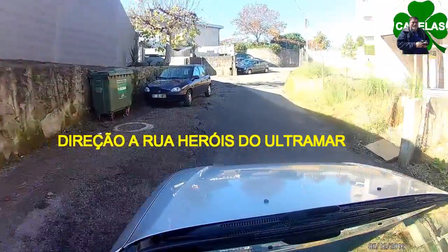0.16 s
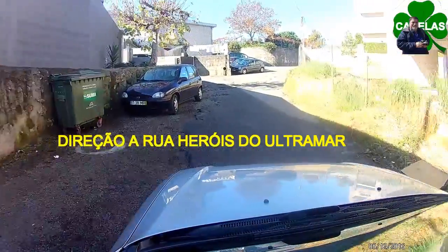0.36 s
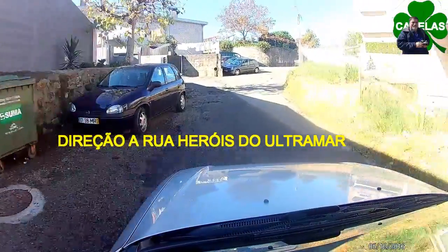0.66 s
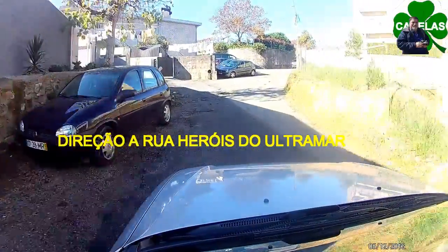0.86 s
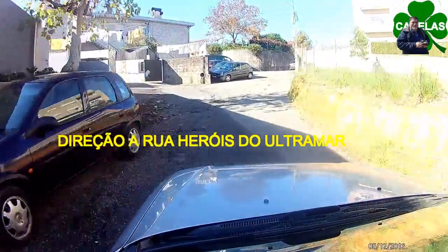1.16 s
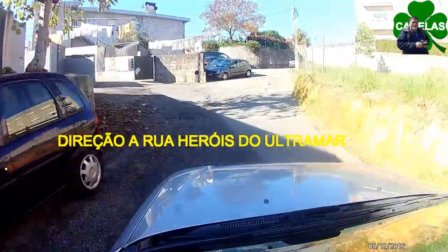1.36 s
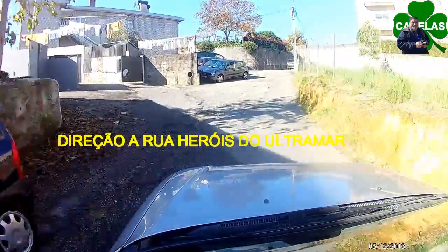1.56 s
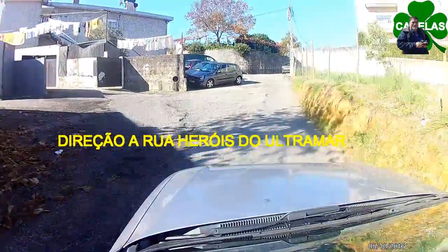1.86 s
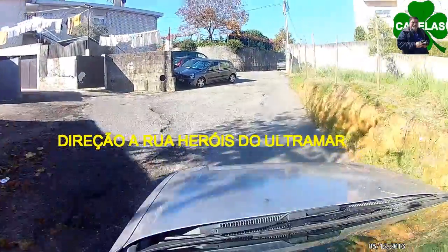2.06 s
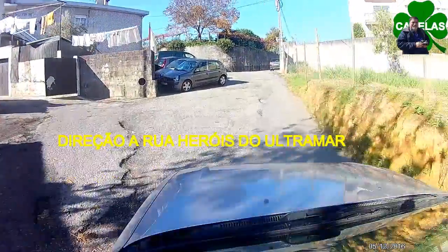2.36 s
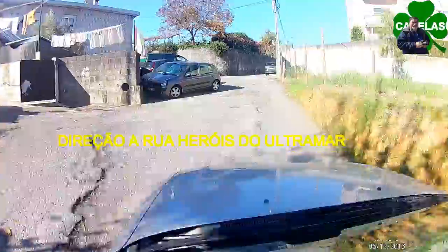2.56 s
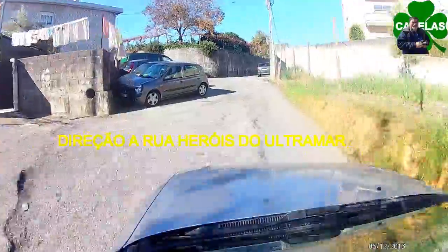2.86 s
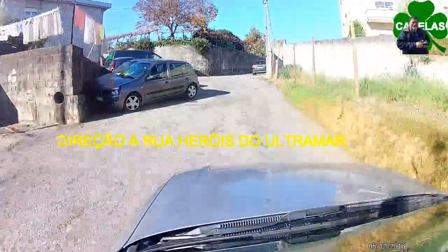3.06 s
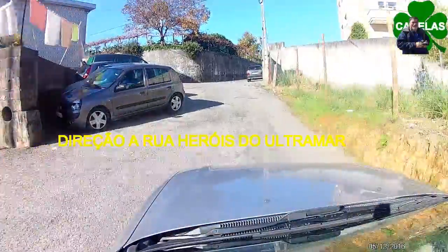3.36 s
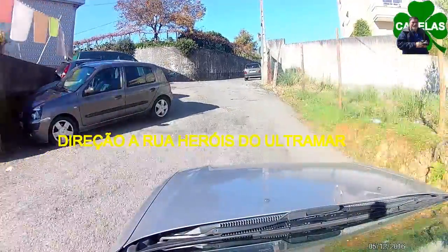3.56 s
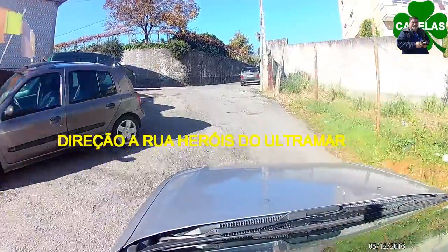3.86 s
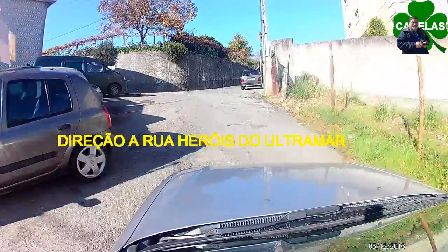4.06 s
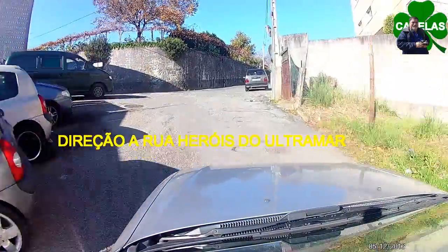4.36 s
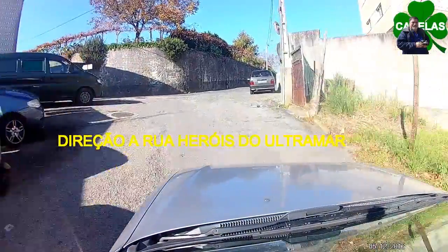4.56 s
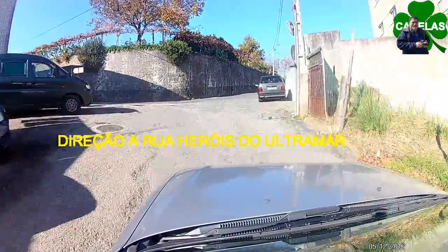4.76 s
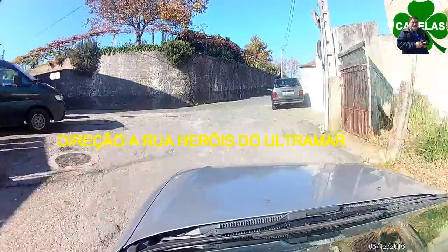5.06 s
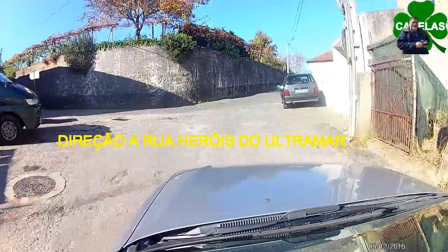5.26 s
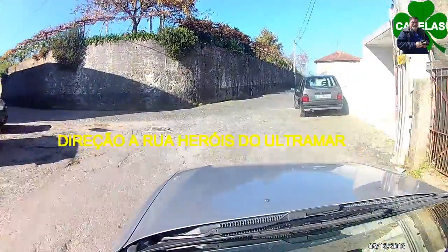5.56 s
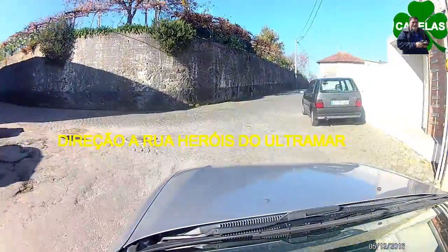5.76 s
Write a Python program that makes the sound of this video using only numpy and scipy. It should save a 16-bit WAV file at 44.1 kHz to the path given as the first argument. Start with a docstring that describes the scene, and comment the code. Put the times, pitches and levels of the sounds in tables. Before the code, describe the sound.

Car tyres rumble and crunch slowly over rough, gritty paving, heard from inside, with pothole thuds and rattling trim.

```python
"""Car tyres roll slowly over rough village paving, heard from behind the windscreen.
Stones drum through the tyres into the cabin, the tread roars and crunches on grit and gravel,
pebbles crack and potholes make the body boom. Loose trim rattles; the hardest jolt snaps a
nearby piece of plastic. Faint high squeaks and chirps come and go over a steady hiss."""
import sys
import numpy as np
from scipy.fft import rfft, irfft, next_fast_len
from scipy.io import wavfile
from scipy.ndimage import map_coordinates

SR = 44100
rng = np.random.default_rng(int(sys.argv[2]) if len(sys.argv) > 2 else 0)


def wav_out(sig):
    """Save sig, one row per channel (or a flat mono array), as 16-bit PCM at SR to the path in sys.argv[1]."""
    wavfile.write(sys.argv[1], SR, np.round(np.clip(np.atleast_2d(sig).T, -1, 1) * 32767).astype(np.int16))


N = 261513

# stones drumming into the cabin, spectrum: freq_hz, density_db
DRUM_SPECTRUM = [(70, -41), (115, -13), (155, 1), (240, 1), (330, -0.5), (420, -2.5), (560, -3.5),
                 (720, -13), (1000, -30), (2000, -77.5)]


def amp(db):
    """Decibels to gain."""
    return 10 ** (np.asarray(db) / 20)


def unit(x):
    """x at rms 1."""
    return x / np.sqrt(np.mean(x ** 2) + 1e-20)


def wobble(knots_per_s):
    """Smooth random curve."""
    knots = rng.standard_normal(int(N * knots_per_s / SR) + 4)
    return map_coordinates(knots, [np.arange(N) * knots_per_s / SR])


def filtered(x, response):
    """x through a gain that depends on frequency."""
    size = next_fast_len(len(x) + SR // 2)
    return irfft(rfft(x, size) * response(np.fft.rfftfreq(size, 1 / SR)), size)[:len(x)]


def coloured(x, spectrum):
    """x shaped by (freq_hz, density_db) points on a log axis, at rms 1."""
    freq_hz, density_db = np.transpose(spectrum)
    gain = lambda hz: amp(np.interp(np.log(hz + 1), np.log(freq_hz), density_db, left=-120, right=-120))
    return unit(filtered(x, gain))


def fuzzy_tone(centre_hz, width_hz):
    """Narrow-band noise at rms 1."""
    band = lambda hz: np.exp(-.5 * ((hz - centre_hz) / width_hz) ** 2)
    return unit(filtered(rng.standard_normal(N), band))


def impacts(rate_per_s, scatter_db):
    """Randomly timed contacts of scattered size, at rms 1."""
    sizes = amp(scatter_db * np.clip(rng.standard_normal(N), -2, 2)) * rng.choice([-1, 1], N)
    return unit((rng.random(N) < rate_per_s / SR) * sizes)


def swell(progress):
    """Half-sine envelope over progress 0 to 1."""
    return np.sin(np.pi * np.clip(progress, 0, 1))


def attack(t, rise_s):
    """Exponential rise to 1."""
    return 1 - np.exp(-t / rise_s)


def decay(t, level_db, t60_s):
    """Exponential fall from level_db."""
    return amp(level_db - 60 * t / t60_s)


def add(track, start_s, sound):
    """Mix sound into track from start_s."""
    part = track[max(0, round(start_s * SR)):][:len(sound)]
    part += sound[:len(part)]


def hiss(level_db=-67.5):
    """Steady, faint high hiss."""
    # hiss spectrum: freq_hz, density_db
    spectrum = [(3000, -10.5), (5000, 3.5), (6500, 2), (8500, -3.5), (9600, -4), (10300, -3), (11500, -5),
                (13000, -10.5), (15500, -14)]
    return amp(level_db) * coloured(rng.standard_normal(N), spectrum)


def chirps(pitch_hz=9620, level_db=-67.5, scatter_db=2, mean_length_s=0.014, mean_gap_s=0.045):
    """Tiny, fuzzy high chirps at uneven intervals."""
    gate, t = np.zeros(N), np.arange(SR // 20) / SR
    start_s = 0
    for gap_jitter, length_jitter, level_jitter in rng.uniform(-1, 1, size=(200, 3)):
        start_s += mean_gap_s * (1 + gap_jitter / 2)
        length_s = mean_length_s * (1 + length_jitter / 2)
        add(gate, start_s, amp(level_db + scatter_db * level_jitter) * swell(t / length_s))
    return gate * fuzzy_tone(pitch_hz, width_hz=210)


def squeaks():
    """Faint, fuzzy squeaks swell and fade."""
    # squeaks: start_s, length_s, pitch_hz, level_db
    events = [(1.863, .09, 6900, -61), (2.49, 0.044, 9250, -67), (2.686, 0.125, 6400, -60),
              (2.82, 0.22, 6460, -64), (4.07, 0.059, 9250, -71), (4.2, 0.24, 6500, -66),
              (4.62, 0.2, 6760, -63)]
    t = np.arange(N) / SR
    return sum(amp(level_db) * swell((t - start_s) / length_s) * fuzzy_tone(pitch_hz, width_hz=360)
               for start_s, length_s, pitch_hz, level_db in events)


def trim_rattle(rise_s=0.0025):
    """Loose plastic trim chatters in brief clusters of tiny contacts."""
    # rattles: start_s, level_db, t60_s
    rattles = [(.155, -39, .05), (.631, -38, .06), (.682, -43, 0.046), (.973, -39, .04), (1.07, -43, .015),
               (1.109, -42, .015), (1.2, -43, .025), (1.747, -44, .025), (2.088, -50, .05),
               (2.337, -47, 0.014), (4.407, -43, 0.06), (4.676, -38, .01), (5.06, -40, .03),
               (5.118, -43, .015)]
    # rattle spectrum: freq_hz, density_db
    spectrum = [(1500, -18), (4000, 7.5), (6100, 6.5), (8000, 1), (9000, -4), (11300, -7.5), (12600, -18),
                (15000, -31)]
    out, t = np.zeros(N), np.arange(SR // 10) / SR
    for start_s, level_db, t60_s in rattles:
        chatter = coloured(impacts(3500, scatter_db=2.5)[:len(t)], spectrum)
        add(out, start_s, attack(t, rise_s) * decay(t, level_db, t60_s) * chatter)
    return out


def plastic_snap(rise_share=0.09):
    """A close plastic part snaps and rebounds; each mode builds up over a share of its t60."""
    # snap and rebound: start_s, gain_db
    snaps = [(5.0808, 2), (5.0828, -16)]
    # modes of the part: freq_hz, relative_db, t60_s
    modes = [(1420, 0.5, 0.0096), (1810, 2.5, 0.007), (2420, -0.5, 0.007), (4300, -1.5, 0.0037),
             (4800, -9.5, 0.0055), (6400, -15, 0.0035), (7050, -19.5, .005), (8700, -25, 0.0038),
             (10200, -27, .004), (11400, -16.5, 0.0032), (12500, -27.5, .005), (14000, -34.5, .004)]
    out, t = np.zeros(N), np.arange(SR // 10) / SR
    ring = sum(attack(t, rise_share * t60_s) ** 2 * decay(t, db, t60_s) * np.sin(2 * np.pi * hz * t)
               for hz, db, t60_s in modes)
    for start_s, gain_db in snaps:
        add(out, start_s, amp(gain_db) * ring)
    return out


def gravel():
    """Loose gravel crunches under the tyres, swelling and fading over each patch."""
    # gravel patches: start_s, length_s, level_db
    patches = [(0.205, 0.11, -35), (2.558, 0.043, -48), (4.118, 0.054, -45), (4.328, 0.074, -47),
               (4.667, 0.23, -42), (4.882, 0.31, -42)]
    # crunch spectrum: freq_hz, density_db
    spectrum = [(1500, -21), (2800, 6), (4200, 2), (5300, -11.5), (6700, -12.5), (9000, -29),
                (11300, -30.5), (15000, -47)]
    t = np.arange(N) / SR
    envelope = sum(amp(db) * swell((t - start_s) / length_s) for start_s, length_s, db in patches)
    return envelope * coloured(impacts(2800, scatter_db=13.5), spectrum)


def pebbles(rise_s=0.00057):
    """Pebbles crack under the tyres in short, bright bursts."""
    # cracks: start_s, level_db, t60_s
    cracks = [(.008, -19, 0.15), (.182, -17, .1), (.21, -17, .1), (0.244, -20, .12), (.268, -22.5, .12),
              (0.633, -16, .03), (4.36, -24.5, .02), (4.385, -22, .015), (4.615, -21, .02),
              (4.737, -26, .015)]
    # crack spectrum: freq_hz, density_db
    spectrum = [(600, -11), (1300, 12), (1800, 0.5), (2500, -9.5), (4000, -20), (5200, -26.5),
                (9000, -36.5)]
    out, t = np.zeros(N), np.arange(SR // 4) / SR
    for start_s, level_db, t60_s in cracks:
        burst = coloured(impacts(6000, scatter_db=0)[:len(t)], spectrum)
        add(out, start_s, attack(t, rise_s) * decay(t, level_db, t60_s) * burst)
    return out


def stone_slaps(rise_s=0.002):
    """Single raised stones slap the soft tread."""
    # slaps: start_s, level_db, t60_s
    slaps = [(.095, -12.5, 0.19), (.185, -21, 0.12), (.243, -13.5, 0.15), (.268, -15, 0.088),
             (.572, -12, 0.13), (0.631, -5.5, 0.053), (0.681, -9.5, 0.11), (1.596, -9, 0.071),
             (1.875, -25, 0.14), (2.575, -16, 0.051), (3.17, -18.5, 0.35), (4.116, -18, 0.25),
             (4.6, -20.5, 0.28), (5.405, -16, 0.14), (5.6, -17.5, 0.2), (5.735, -14, 0.11)]
    # slap spectrum: freq_hz, density_db
    spectrum = [(250, -20), (480, 9), (700, -1), (1100, 2.5), (1600, -12), (2100, -21), (3300, -27),
                (6000, -59.5)]
    out, t = np.zeros(N), np.arange(SR // 4) / SR
    for start_s, level_db, t60_s in slaps:
        burst = coloured(rng.standard_normal(len(t)), spectrum)
        add(out, start_s, attack(t, rise_s) * decay(t, level_db, t60_s) * burst)
    return out


def potholes(rise_s=0.011):
    """The suspension softens each blow into a thud and a swelling boom of the cabin's modes."""
    # blows: start_s, low_boom_db, upper_boom_db, thud_db, thud_t60_s
    blows = [(.15, -7, -10, -8.5, 0.13), (0.227, -23, -11, -8.5, 0.19), (.272, -20, -8.5, -3, 0.29),
             (.335, -3, -15, -26, .2), (.52, -5, -20, -20, .15), (.612, -11, 1.5, -13, 0.2),
             (.659, -3, -8.5, -2.5, 0.18), (.715, -14, -18.5, -10, 0.2), (.804, -30.5, -6.5, -25, 0.22),
             (.961, -8, 0.5, -7, 0.28), (1.039, 1.5, -25, -8, 0.22), (1.088, -25, -18, -9.5, 0.32),
             (1.185, -20.5, -19, -16, .2), (1.596, -16, -23, -14, 0.16), (1.808, -6, -12, -10, 0.2),
             (1.862, -12, -22, -15.5, .2), (2.01, -6, -25, -12.5, 0.27), (3.015, -27, -23, -10, 0.1),
             (3.234, -31, -6.5, -25, 0.22), (3.369, -25, -7, -24, 0.18), (3.953, -11, -14, -11, 0.18),
             (4.615, -22, -21, -11.5, 0.15), (4.66, -7, -5, -9.5, 0.19), (5.037, 2, -1.5, -3, 0.2),
             (5.089, 2.5, -16, -7.5, 0.21), (5.145, -14, -11, -16, 0.2), (5.599, -21, -12.5, -18, 0.16),
             (5.816, -15, -10.5, -5.5, 0.13)]
    # low and upper cabin mode: freq_hz, t60_s
    cabin_modes = [(57, 0.28), (111, 0.23)]
    out, t = np.zeros(N), np.arange(SR // 2) / SR
    for start_s, low_boom_db, upper_boom_db, thud_db, thud_t60_s in blows:
        boom = sum(decay(t, db, t60_s) * np.sin(2 * np.pi * hz * t)
                   for db, (hz, t60_s) in zip((low_boom_db, upper_boom_db), cabin_modes))
        thud = decay(t, thud_db, thud_t60_s) * coloured(rng.standard_normal(len(t)), DRUM_SPECTRUM)
        add(out, start_s, attack(t, rise_s) * (boom + thud))
    return out


def tyres_on_paving(lumpy_start_s=4.56, lumpy_fade_s=0.058):
    """Big stones rumble, small ones drum, tread roars, grit crackles, trim buzzes; all follow the shake."""
    # how hard the paving shakes the tyres: time_s, shake_db
    shaking = [(0.0, 10), (0.12, 6.5), (0.28, 8), (0.45, 6), (0.85, 4), (1.32, 4), (1.48, 1.5), (1.7, 0.9),
               (2.15, -4), (3.08, -5), (3.45, -2), (3.64, -0.3), (3.97, -1.5), (4.15, -0.9), (4.4, -1),
               (4.52, -5), (4.7, -3), (5.06, 2), (5.22, -1), (5.93, -2)]
    # cabin rumble: freq_hz, density_db
    rumble_spectrum = [(8, -26.5), (18, -6), (27, 2), (40, 3.5), (54, 1.5), (76, -1), (108, 2), (145, -1.5),
                       (200, -27), (400, -69)]
    # tread roar: freq_hz, density_db
    tread_spectrum = [(350, -31.5), (600, -3), (780, 0), (1050, 0.5), (1300, -3.5), (1600, -10),
                      (2000, -15), (2500, -23.5), (3300, -30), (6000, -72.5)]
    # grit crackle: freq_hz, density_db
    grit_spectrum = [(1200, -19.5), (2200, 3.5), (2900, 3), (3800, 3), (4400, -5), (5300, -18),
                     (6700, -19.5), (9000, -28.5), (11300, -35), (12500, -48.5), (15500, -54)]
    # trim buzz: freq_hz, density_db
    buzz_spectrum = [(1500, -22.5), (4000, 5.5), (6100, 7.5), (9000, -8), (11300, -12), (12500, -29),
                     (15000, -39.5)]
    t = np.arange(N) / SR
    shake_db = np.interp(t, *np.transpose(shaking))
    lumpy = np.clip((t - lumpy_start_s) / lumpy_fade_s, 0, 1)  # onto lumpier paving

    def gain(base_db, shake_slope, lumpy_db):
        return amp(base_db + shake_slope * shake_db + lumpy_db * lumpy)

    load_db = wobble(24)  # tyres press harder on each raised stone
    rumble = coloured(impacts(900, scatter_db=2.5), rumble_spectrum)
    drum = amp(1.2 * load_db) * coloured(impacts(2500, scatter_db=2.5), DRUM_SPECTRUM)
    tread = amp(load_db) * coloured(impacts(8000, scatter_db=3), tread_spectrum)
    grains = rng.standard_normal(N) + 0.77 * impacts(700, scatter_db=8.5)  # fine sand, coarse grains
    grit = amp(0.7 * load_db + 1.3 * wobble(70)) * coloured(grains, grit_spectrum)
    buzz = coloured(impacts(500, scatter_db=0), buzz_spectrum)
    return (rumble * gain(base_db=-19, shake_slope=0.33, lumpy_db=3.5)
            + drum * gain(base_db=-16.5, shake_slope=0.56, lumpy_db=1)
            + tread * gain(base_db=-22.5, shake_slope=0.93, lumpy_db=0.67)
            + grit * gain(base_db=-45, shake_slope=1.3, lumpy_db=4)
            + buzz * gain(base_db=-66.5, shake_slope=1.6, lumpy_db=6))


def scene():
    """Mono sum at the windscreen."""
    background = hiss()
    road = tyres_on_paving() + gravel() + stone_slaps() + pebbles() + potholes()
    return (background + road + trim_rattle() + plastic_snap() + squeaks() + chirps())[None]


def record(dry, ceiling=1.08, notch_hz=7880, notch_width_hz=400, notch_db=-16, cutoff_hz=15700):
    """Soft clip, narrow treble dip, low-pass."""
    clipped = dry[0] / (1 + np.abs(dry[0] / ceiling) ** 5) ** (1 / 5)
    notch = lambda hz: amp(notch_db * np.exp(-.5 * ((hz - notch_hz) / notch_width_hz) ** 2))
    notched = filtered(clipped, notch)
    return filtered(notched, lambda hz: hz < cutoff_hz)[None]


dry = scene()
out = record(dry)
wav_out(out)
```